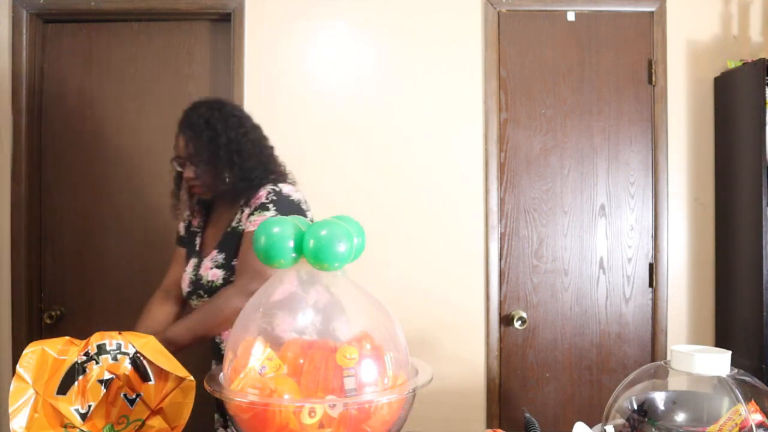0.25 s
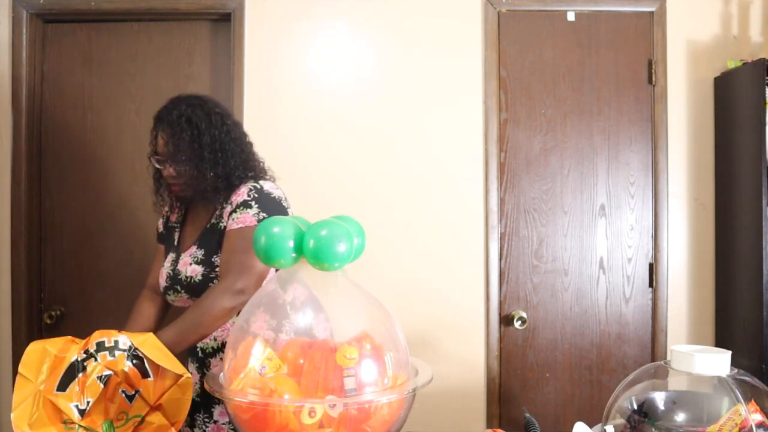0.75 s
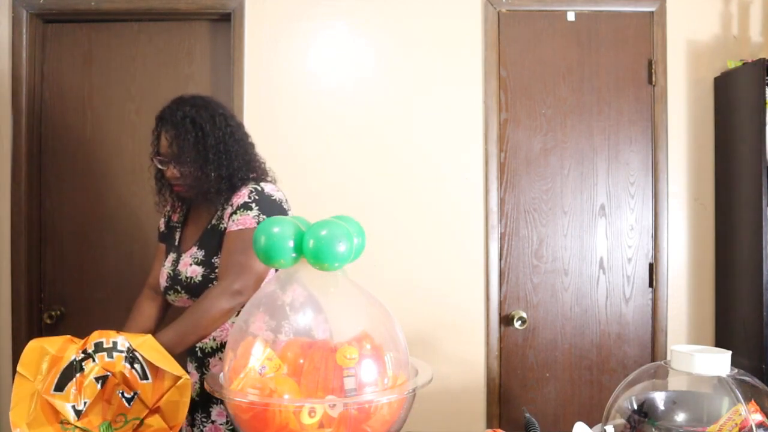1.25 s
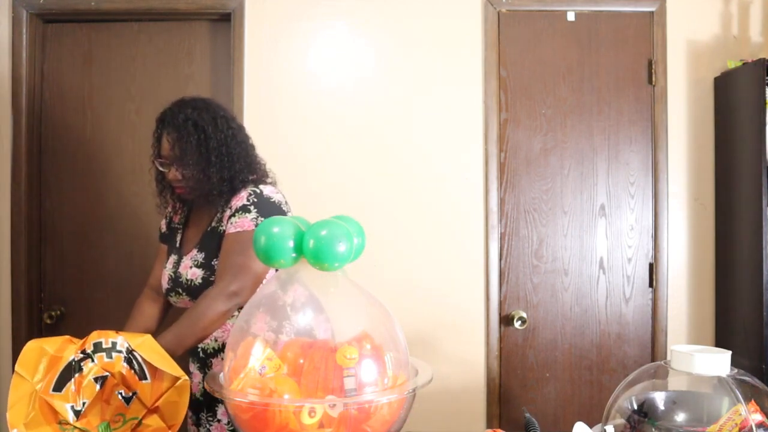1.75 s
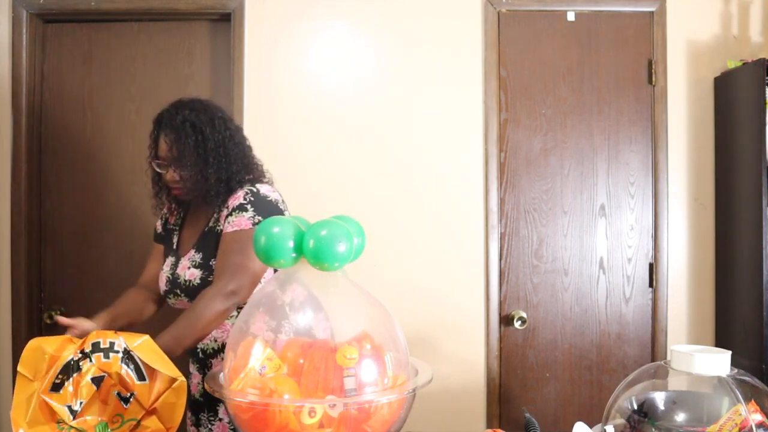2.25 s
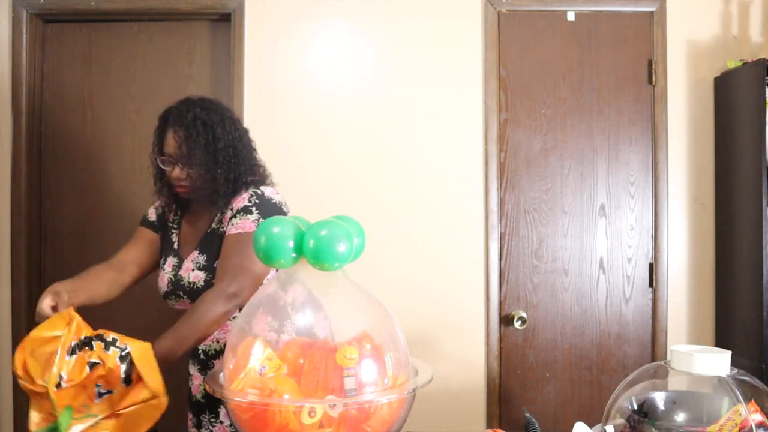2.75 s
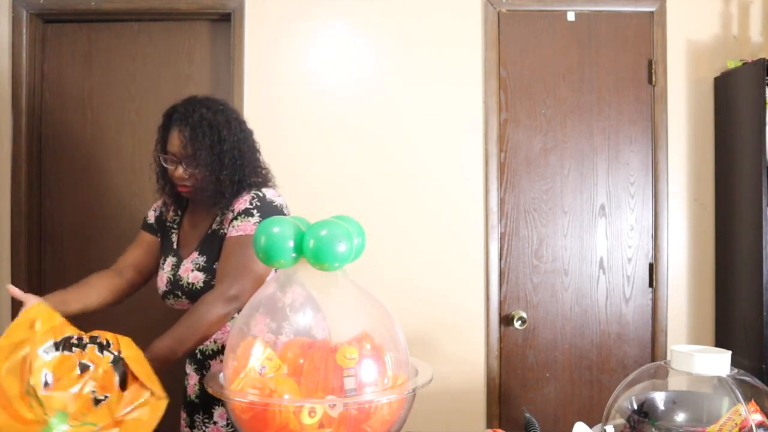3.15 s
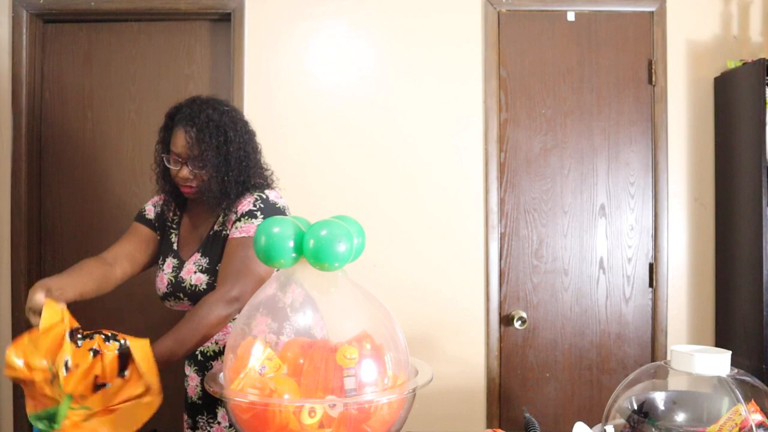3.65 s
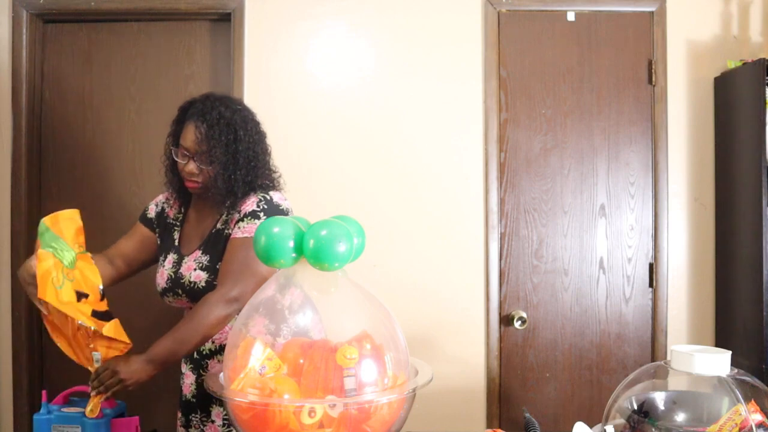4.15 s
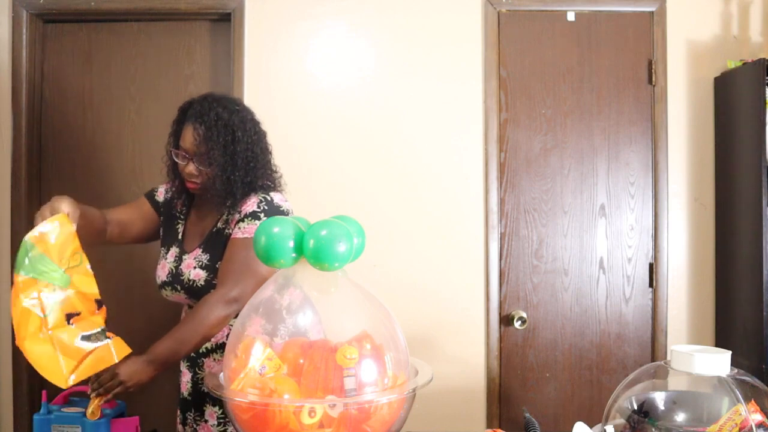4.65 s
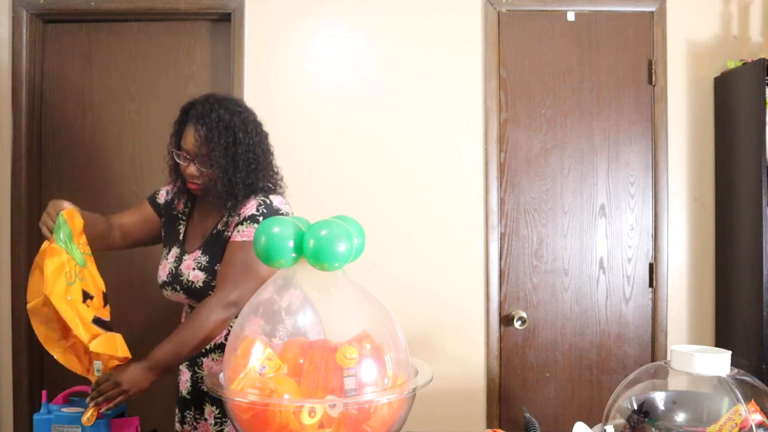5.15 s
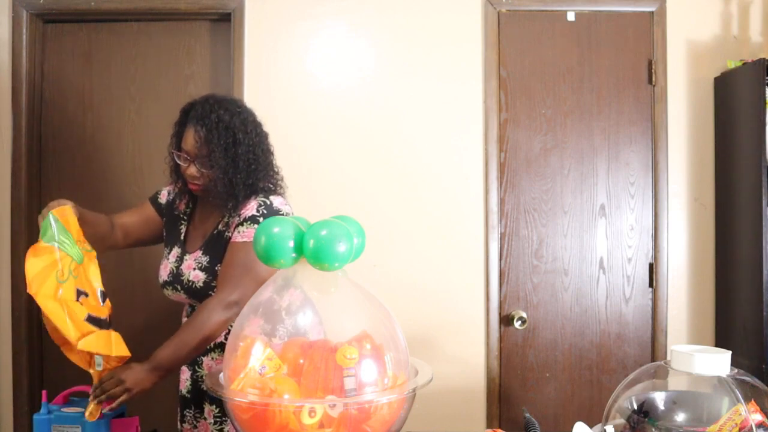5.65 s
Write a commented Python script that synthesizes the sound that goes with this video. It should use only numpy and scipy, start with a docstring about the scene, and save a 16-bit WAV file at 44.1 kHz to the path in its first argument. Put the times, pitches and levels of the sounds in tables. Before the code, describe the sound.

In a small bare room, a foil balloon crinkles faintly and a finger taps a plastic case over a low appliance hum. A switch clicks sharply, and an electric balloon pump races up to a high whine. It keeps running to the end, with a hollow roar of air, a hiss at the nozzle and a little table rumble. The sound is wide, with the pump slightly left of the microphones.

```python
"""A small bare room, where an electric balloon pump stands on a table, left of two microphones.
Appliances hum, a clatter dies away, and fingers crinkle a foil balloon and tap the pump's plastic case.
The switch clicks and the motor spins up to a whine, made by its unbalanced shaft and its fan blades.
The rushing air roars, howls in the pump's chamber, hisses at the nozzle and shakes the table.
Much of the treble reaches the two microphones in opposite phase: one is pushed as the other is pulled."""
import sys
import numpy as np
from scipy import signal
from scipy.fft import rfft, irfft, next_fast_len
from scipy.io import wavfile
from scipy.ndimage import map_coordinates

SR = 44100
rng = np.random.default_rng(int(sys.argv[2]) if len(sys.argv) > 2 else 0)


def digitize_waveform(pressure):
    """Quantize a signal to 16-bit integers and store it at the path in sys.argv[1].

    Rows of a 2-D input are taken as channels; values are limited to [-1, 1].
    """
    field = np.atleast_2d(pressure).T
    bounded = np.clip(field, -1, 1)
    quanta = np.round(bounded * 32767).astype(np.int16)
    wavfile.write(sys.argv[1], SR, quanta)


N = 261072
SWITCH_S, MAINS_HZ = .789, 60
TIME = np.arange(N) / SR
RUN_S = np.clip(TIME - SWITCH_S, 0, None)  # time since the pump was switched on

# Low pitches at which the table and room ring: f/Hz, width/Hz, boost/dB
TABLE_RINGS = [(139, 12, 6), (200, 14, 6), (241, 14, 7), (290, 25, 4), (318, 14, 4), (354, 10, 5),
               (371, 10, 7), (403, 12, 9), (472, 18, 5), (498, 10, 3), (545, 20, 4)]
# Spectrum of the rustle, alike (mid) and opposite (side) at the microphones: f/Hz, level/dB
RUSTLE_MID = [(470, -5), (800, -0.5), (1110, -7), (2090, -10.5), (2380, -14), (7790, -29), (12700, -35),
              (14000, -49)]
RUSTLE_SIDE = [(470, -27), (800, -2), (2090, -4), (2320, -6), (2590, -6), (7070, -17), (11800, -21),
               (14000, -30)]


def amp(db):
    """Turn decibels into a gain."""
    return 10 ** (np.asarray(db) / 20)


def unit(x):
    """Scale x to an average (rms) level of 1."""
    return x / np.sqrt(np.mean(x ** 2) + 1e-20)


def along(points, hz):
    """Read between (frequency, value) points on a logarithmic frequency axis."""
    f, values = np.transpose(points)
    return np.interp(np.log(hz + 1), np.log(f + 1), values)


def curves(rows):
    """Turn rows of (time, values...) into one curve for each value."""
    times, *columns = np.transpose(rows)
    return [np.interp(TIME, times, column) for column in columns]


def wobble(rate):
    """A smooth curve through `rate` random values a second."""
    return map_coordinates(rng.standard_normal(int(N * rate / SR) + 4), [np.arange(N) * rate / SR])


def filtered(x, response):
    """Multiply each frequency f in x by response(f)."""
    size = next_fast_len(N + SR // 2)
    return irfft(rfft(x, size) * response(np.fft.rfftfreq(size, 1 / SR)), size)[..., :N]


def peak(f, hz, width_hz):
    """One resonance, with gain 1 at its centre."""
    return 1j * f * width_hz / (hz * hz - f * f + 1j * f * width_hz)


def colour(points, rings=()):
    """A filter shaped like a spectrum, with any ringing pitches standing out."""
    boost = lambda f: sum((amp(db) - 1) * abs(peak(f, hz, width)) ** 2 for hz, width, db in rings)
    return lambda f: amp(along(points, f)) * (1 + boost(f))


def stereo_noise(mid_colour, side_colour, side_db, lean, ahead=0):
    """Noise rippled by the room's standing waves; lean moves it left, ahead makes it arrive there first."""
    mid, side = rng.standard_normal((2, N))
    mid_bumps, side_bumps = rng.standard_normal((2, 2000))
    ripple = lambda f, bumps: amp(2.15 * np.clip(f / 1500, 0, 1) ** 2 * map_coordinates(bumps, [f / 14]))
    mid = unit(filtered(mid, lambda f: mid_colour(f) * ripple(f, mid_bumps)))
    side = amp(side_db) * unit(filtered(side, lambda f: side_colour(f) * ripple(f, side_bumps)))
    side += filtered(mid, lambda f: lean + 1j * ahead * f / (f + 800))
    return np.array([mid + side, mid - side])


def tone(turns, per_turn, db, left_db, lead, drift):
    """A tone tied to the shaft, `lead` radians earlier on the left; echoes make level and phase drift."""
    half_lead = (lead + drift * wobble(2.96)) / 2
    level = amp(db + np.array([left_db / 2 + drift * wobble(5.1), -left_db / 2 + drift * wobble(9.5)]))
    return np.sqrt(2) * level * np.sin(2 * np.pi * per_turn * turns + np.array([half_lead, -half_lead]))


def clatter_fade():
    """The level of a clatter dying in the room, quickly and then slowly."""
    return amp(-39.5 - 60 * TIME / .21) + amp(-48 - 60 * TIME / 2)


def clatter():
    """A few pitches linger in the dying noise."""
    # The lingering pitches: f/Hz, width/Hz, boost/dB
    rings = [(1480, 30, 10), (1800, 50, 9), (2100, 40, 4), (2620, 70, 8), (3100, 100, 6), (3880, 90, 9)]
    noise = stereo_noise(colour(RUSTLE_MID, rings), colour(RUSTLE_SIDE, rings), side_db=-2.5, lean=.16)
    return clatter_fade() * noise


def household_hum():
    """Appliances drone; the hum sounds a little louder with the clatter and quieter once the pump runs."""
    # Spectrum of the hum, mid and side: f/Hz, level/dB
    mid = [(15, -55), (40, -24), (86, -22), (130, -17), (250, -12.5), (420, -13.5), (600, -20), (1200, -54),
           (2600, -120)]
    side = [(120, -27), (200, 6), (408, -16), (446, -5), (1200, -22), (1560, -50), (2640, -120)]
    # Resonances in the hum: f/Hz, width/Hz, boost/dB
    rings = [(262, 15, -7), (404, 18, -3), (516, 28, 9.5)]
    # Appliance tones: f/Hz, level relative to the noise/dB
    drones = [(120, -9), (139.5, -6)]
    hum = stereo_noise(colour(mid, rings), colour(side), side_db=-3, lean=.02)
    for hz, db in drones:
        hum += np.sqrt(2) * amp(db) * np.sin(2 * np.pi * hz * TIME + .5 * wobble(3.36))
    hum_db = curves([(.9, -43), (1.6, -61)])[0] + .73 * wobble(15)
    return (amp(hum_db) + amp(-20) * clatter_fade()) * hum


def rustle():
    """A faint steady rustle swells as a hand brushes the foil."""
    # Strokes of the hand: t/s, half length/s, level/dB
    strokes = [(0.665, 0.045, -52.5)]
    swell = sum(amp(db) * np.exp(-((TIME - s) / half_s) ** 2) for s, half_s, db in strokes)
    return (amp(-50) + swell) * stereo_noise(colour(RUSTLE_MID), colour(RUSTLE_SIDE), side_db=-2, lean=.19)


def foil_crinkles():
    """The foil shifts under the fingers in short, crisp bursts."""
    # Crinkles: t/s, level/dB, time to fade 60 dB/s
    crinkles = [(0.383, -57, .03), (0.397, -57, .03), (0.404, -57, .1), (0.482, -62, .12),
                (0.522, -60, .12), (0.597, -57, .12), (0.656, -60, .06)]
    bursts = sum(amp(db - 60 * np.abs(TIME - s) / fade_s) * np.clip((TIME - s) / .005, 0, 1)
                 for s, db, fade_s in crinkles)
    crisp = lambda f: f / (f + 5000) / (1 + (f / 11000) ** 4)
    return bursts * stereo_noise(crisp, crisp, side_db=7, lean=.1)


def finger_taps():
    """A finger touches the plastic case, which gives a short, dull ring."""
    # Taps: t/s, f/Hz, level/dB, time to fade 60 dB/s
    taps = [(0.599, 2160, -43, .05), (0.635, 1190, -38, .05)]
    rings = 0
    for s, hz, db, fade_s in taps:
        age = np.clip(TIME - s, 0, None)
        rings += amp(db - 60 * age / fade_s) * np.sin(2 * np.pi * hz * age + .8 * wobble(250)) * (age > 0)
    return rings * amp([[1], [-1]])


def switch_click():
    """The rocker switch is pressed, snaps over and lands, and the walls answer."""
    # The three snaps: t/s, level/dB, time to fade 60 dB/s
    snaps = [(.778, -32, 0.0089), (0.789, -18, 0.021), (0.793, -21, 0.022)]
    age = np.arange(SR // 10) / SR
    click = np.zeros(N)
    for s, db, fade_s in snaps:
        click[round(s * SR):][:len(age)] += amp(db - 60 * age / fade_s) * rng.standard_normal(len(age))
    click = filtered(click, lambda f: 1 / (1 + 1j * f / 12000) + amp(-8) * peak(f, 3400, 270))
    return click * [[1], [-.4]] + amp(4) * wall_echo(click)


def wall_echo(x):
    """Each frequency dies at its own speed; the echo's treble is mostly opposite left and right."""
    # How long the room rings: f/Hz, time to fade 60 dB/s
    fades = [(200, 0.33), (2000, 0.49), (10000, 0.16)]
    hz, t, noise = signal.stft(rng.standard_normal((2, SR // 2)), SR, nperseg=256)
    share = np.array([1 / (1 + hz / 3000), hz / (hz + 900)])[:, :, None]  # mid, side
    tail = signal.istft(noise * share * amp(-60 * t / along(fades, hz)[:, None]), SR, nperseg=256)[1]
    mid, side = signal.fftconvolve(x[None], tail / np.linalg.norm(tail[1]), axes=1)[:, :N]
    return np.array([mid + side, mid - side])


def shaft_tone(turns, shaft_hz):
    """The unbalanced shaft shakes the case once a turn, waking each low resonance as its pitch rises."""
    # How loudly the case and room give out each pitch: f/Hz, level/dB
    loudness = [(45, -54), (105, -36), (136, -23.5), (200, -42), (290, -33), (350, -42), (420, -27.5),
                (478, -33.5), (540, -32), (600, -27.5), (630, -23.5), (650, -12), (657, -19.5), (664, -25),
                (672, -17), (682, -15), (697, -14.5), (712, -19), (722, -17)]
    flutter_db = .95 * wobble(19)
    judder_db = 3.5 * np.exp(-RUN_S / .69) * wobble(45.4)  # the pump lurches up to speed
    db = along(loudness, shaft_hz) + flutter_db + judder_db
    shaft = tone(turns, per_turn=1, db=db, left_db=6, lead=.1, drift=.14)
    table = lambda f: sum(.37 * amp(boost) * peak(f, hz, width) for hz, width, boost in TABLE_RINGS)
    return shaft + filtered(shaft, table)


def blade_whine(turns):
    """Seven fan blades whine; a hand and the swelling foil shift the tone's reflections."""
    # The tone at the microphones: t/s, level/dB, left lead/rad, left minus right/dB
    changes = [(.88, -63, 2, 0), (.97, -34, 2.8, 4), (1.09, -29, 1.5, 9), (1.13, -36, 2.1, 2),
               (1.18, -43, 1.5, 8), (1.23, -28, 2, 9), (1.28, -38, 2.5, 7), (1.38, -30, 3.8, 8),
               (1.46, -34, 3.1, 6), (1.52, -42, 2.2, 2), (1.55, -29.5, 2.6, 8), (1.62, -28.5, 2.2, 7.5),
               (1.78, -24.5, 2.95, -0.5), (1.95, -31.5, 2.2, 4), (2.12, -29.5, 2.2, -7),
               (2.3, -27, 3.4, -1), (2.5, -29.5, 3.8, 7), (2.7, -28, 2.14, -2), (2.9, -32, 2, -7),
               (3.1, -28.5, 3.3, -3.5), (3.27, -32, 3.3, -3.5), (3.56, -31, 1.3, -5), (3.75, -33.5, 2.3, 2),
               (4.1, -36.5, 0.5, 6), (4.4, -40, .3, 11), (4.8, -41.5, 0.45, 9), (5.0, -31, 2, 6),
               (5.44, -33.5, 1.7, 7), (5.55, -38, 3.2, 9), (5.9, -36.5, 3.6, 10)]
    db, lead, left_db = curves(changes)
    lurch = .025 * np.exp(-(RUN_S / .5) ** 2) * (wobble(60) + wobble(160))  # uneven turning smears it
    blades = tone(turns + lurch, per_turn=7, db=db + 1.3 * wobble(30), left_db=left_db, lead=lead, drift=.19)
    outlet_ring = filtered(blades, lambda f: amp(14) * peak(f, 4230, 14.5))
    return blades + outlet_ring


def contact_bars(turns):
    """The motor's twelve contact bars (its commutator) sing while the starting current is strong."""
    # Resonances of the motor's shell: f/Hz, width/Hz, gain/dB
    rings = [(3050, 150, 9), (3290, 80, 19), (3400, 30, 23), (3500, 26, 26), (3580, 40, 19), (3500, 270, 7),
             (4300, 400, -10)]
    # the current, and so the magnetic pull, pulses twice a mains cycle
    current = .15 + .85 * np.abs(np.cos(2 * np.pi * MAINS_HZ * (TIME - .862))) ** .8
    bar_db = -17 - 49 * RUN_S
    note = tone(turns + .036 * wobble(300), per_turn=12, db=bar_db, left_db=1, lead=1.5, drift=.3)
    octave = tone(turns + .01 * wobble(300), per_turn=24, db=bar_db - 13, left_db=1, lead=1.5, drift=.3)
    brush_noise = amp(bar_db - 22) * rng.standard_normal((2, N))
    bars = current * (RUN_S > 0) * (note + octave + brush_noise)
    shell = lambda f: .3 + sum(amp(db) * peak(f, hz, width) for hz, width, db in rings)
    treble_cut = lambda f: (.25 + .43 / (1 + (f / 4500) ** 16)) / (1 + 1j * f / 4300) ** 2
    return filtered(bars, lambda f: shell(f) * treble_cut(f))


def motor():
    """The motor races up to speed, then back pressure slows it a little; its whine follows the shaft."""
    # Slowing by back pressure: t/s, speed lost/Hz
    load = [(2.4, 0.4), (2.8, 1.6), (3.3, 1.6), (3.6, 3), (4.1, 3.4), (4.45, 4.8), (4.9, 3.6), (5.4, 3.5),
            (5.65, 6.4), (5.9, 7)]
    # Faint overtones of the shaft: cycles per turn, level/dB
    overtones = [(2, -38.5), (3, -42)]
    slow_gap_hz = 469 * np.exp(-RUN_S / .25)  # the gap to top speed closes in two parts
    quick_gap_hz = 254 * np.exp(-(RUN_S / .064) ** .85)
    shaft_hz = 723.7 - slow_gap_hz - quick_gap_hz - curves(load)[0]
    turns = np.cumsum(shaft_hz + .31 * wobble(12)) / SR
    shaft, blades, bars = shaft_tone(turns, shaft_hz), blade_whine(turns), contact_bars(turns)
    # while the pitch glides, the echoes lag behind and are heard apart from the tone
    gliding = np.clip((690 - shaft_hz) / 90, 0, 1)
    echoes = wall_echo(gliding * (amp(-3.5) * shaft[0] + amp(-1.5) * blades[0] + amp(-4.5) * bars[0]))
    speed_db = 40 * np.log10(shaft_hz / shaft_hz[-1])
    faint = sum(tone(turns, k, db + speed_db, left_db=-4, lead=1.9, drift=.92) for k, db in overtones)
    iron_core_hum = amp(-59) * np.sin(2 * np.pi * 2 * MAINS_HZ * TIME)
    return shaft + blades + bars + echoes + faint + iron_core_hum


def fan_roar():
    """Churning air makes the fan's housing ring."""
    # Spectrum of the roar, mid and side: f/Hz, level/dB
    mid = [(470, -27.5), (800, 2.5), (904, -7), (984, -6.5), (1090, -6.5), (1870, -13), (2040, -10.5),
           (4700, -21), (5000, -16), (6500, -30.5), (11000, -120)]
    side = [(470, -46), (800, 2.5), (1450, -7), (1850, -12), (2040, -5), (2990, -8.5), (3540, -4),
            (4780, -26), (5000, -6.5), (6500, -33), (11000, -120)]
    # Resonances of the housing: f/Hz, width/Hz, boost/dB
    rings = [(1244, 18, 7.5), (1283, 11, 6), (1406, 37, 6.5), (1722, 65, 4), (1971, 30, 6), (2015, 44, 5.5),
             (2076, 33, 6), (2264, 116, 4.5), (2240, 28, 5.5), (3310, 61, 6.5), (3550, 63, 5.5),
             (3605, 78, 6)]
    return stereo_noise(colour(mid, rings), colour(side, rings), side_db=0, lean=.31, ahead=.67)


def chamber_howl():
    """The pump's chamber starts to howl as the air flow builds up."""
    # Resonances of the chamber and room: f/Hz, width/Hz, gain/dB
    rings = [(766, 200, -4), (620.3, 11.5, 1), (665, 10, -2.5), (685.3, 6, 7.5), (747.3, 25, 6.5),
             (783, 10, -5.5), (843, 24, 3), (961, 17, -2.5), (1011.6, 7.8, 4)]
    chamber = lambda f: sum(amp(db) * abs(peak(f, hz, width)) ** 2 for hz, width, db in rings)
    flow = 1 - np.exp(-RUN_S / .033)
    return amp(1.5) * flow * stereo_noise(chamber, chamber, side_db=-12.5, lean=.14, ahead=.19)


def nozzle_hiss():
    """The jet of air hisses at the nozzle."""
    # Spectrum of the hiss, mid and side: f/Hz, level/dB
    mid = [(2240, -42), (3800, -3.5), (4750, -6), (5140, -7.5), (5500, -5.5), (7490, -4.5), (9350, -9),
           (12200, -5), (13800, -22), (14800, -50)]
    side = [(2240, -45), (3800, -15), (4800, 0.5), (4880, -8), (5110, -19), (5500, -5.5), (9140, -7.5),
            (12100, -5), (14800, -22)]
    return stereo_noise(colour(mid, [(7520, 60, 4.3)]), colour(side, [(7400, 150, 4.4)]), side_db=7, lean=.55)


def table_rumble():
    """Churning air shakes the table, which rings at its low pitches."""
    # Spectrum of the rumble: f/Hz, level/dB
    mid = [(15, -75), (40, -36), (70, -16.5), (100, -23), (220, -14.5), (350, -10), (425, -16.5), (460, -3),
           (600, -4), (780, -51), (1300, -120)]
    return stereo_noise(colour(mid, TABLE_RINGS), lambda f: colour(mid)(f) * f, side_db=-11.5, lean=.096)


def rushing_air():
    """The air noises swell after switch-on, then sound quieter as the recorder turns its gain down."""
    # Levels as heard, with the recorder's drop in gain: t/s, roar and howl/dB, hiss/dB, rumble/dB
    levels = [(0.79, -39, -30, -30), (0.8, -34, -35, -32), (0.82, -25, -42, -30), (0.87, -27.5, -41.5, -31),
              (0.95, -22, -30, -27), (1.11, -19.5, -28, -28.5), (1.38, -23.5, -29.5, -32.5),
              (1.5, -25.5, -32, -36), (2.5, -26.5, -33, -36.5), (4.0, -28, -34, -39),
              (5.3, -27.5, -34, -38), (5.7, -27.5, -31.5, -41)]
    roar_db, hiss_db, rumble_db = curves(levels)
    roar, hiss, rumble = fan_roar() + chamber_howl(), nozzle_hiss(), table_rumble()
    hiss_db += .4 * wobble(11)
    rumble_db += 1.17 * wobble(7)
    return amp(roar_db) * roar + amp(hiss_db) * hiss + amp(rumble_db) * rumble


def scene():
    """All the sounds together; the pump is silent until the switch closes."""
    pump = np.clip(RUN_S / .0041, 0, 1) * (motor() + rushing_air())
    return pump + switch_click() + finger_taps() + household_hum() + rustle() + clatter() + foil_crinkles()


def record(dry):
    """The microphones share their bass, round off loud peaks and lose the deepest and highest sounds."""
    mid, side = (dry[0] + dry[1]) / 2, (dry[0] - dry[1]) / 2
    side = filtered(side, lambda f: 1 / np.sqrt(1 + (330 / (f + 1)) ** 6))
    mid = filtered(mid, lambda f: 1 / np.sqrt(1 + (58 / (f + 1)) ** 4))
    stereo = np.array([mid + side, mid - side])
    rounded = stereo / (1 + np.abs(stereo / .97) ** 8) ** (1 / 8)
    return filtered(rounded, lambda hz: hz < 14950)


dry = scene()
out = record(dry)
digitize_waveform(out)
```